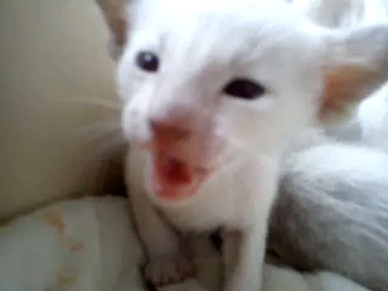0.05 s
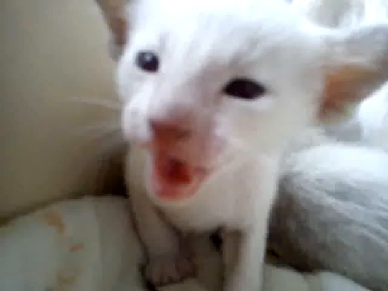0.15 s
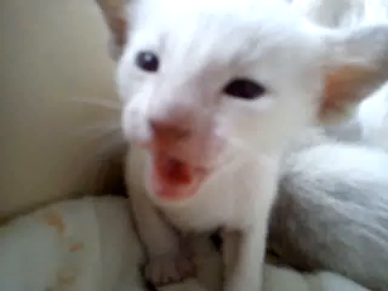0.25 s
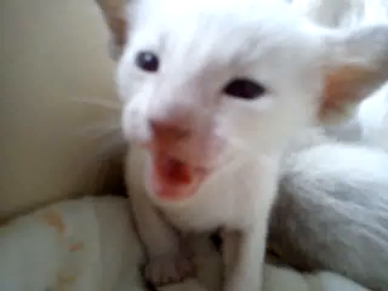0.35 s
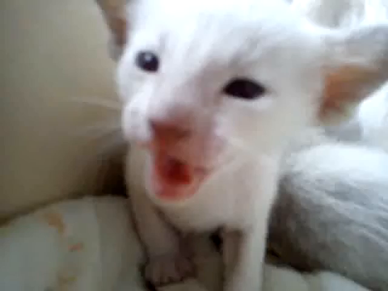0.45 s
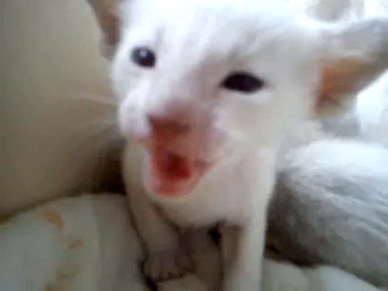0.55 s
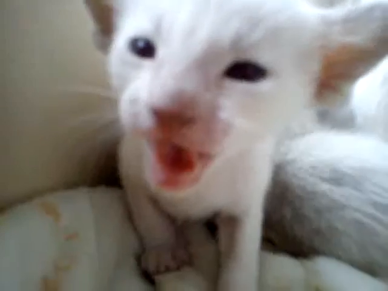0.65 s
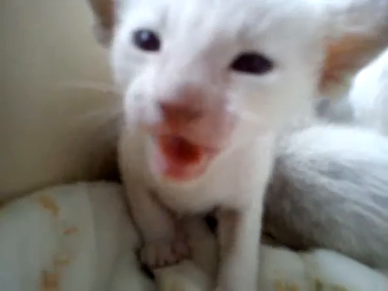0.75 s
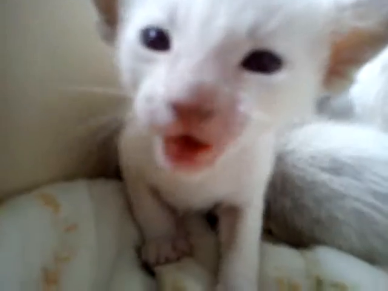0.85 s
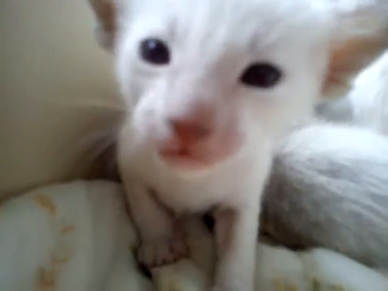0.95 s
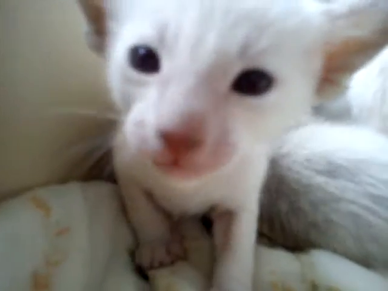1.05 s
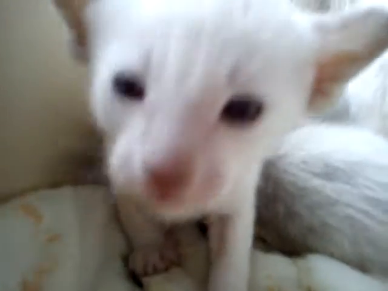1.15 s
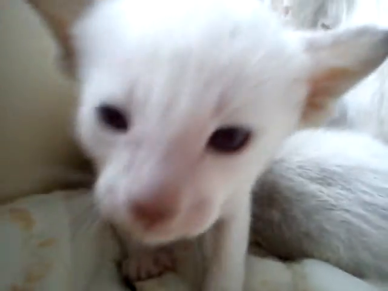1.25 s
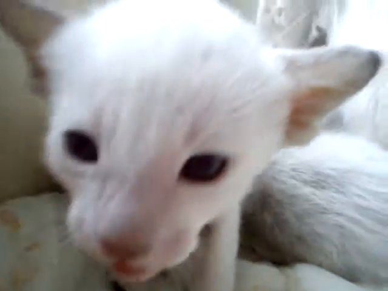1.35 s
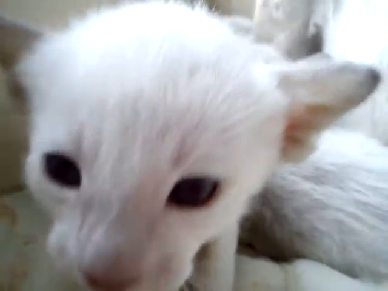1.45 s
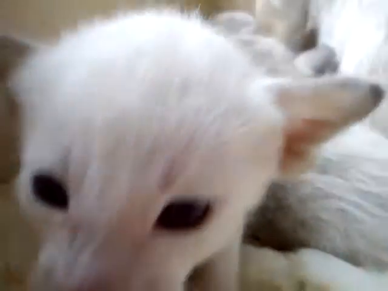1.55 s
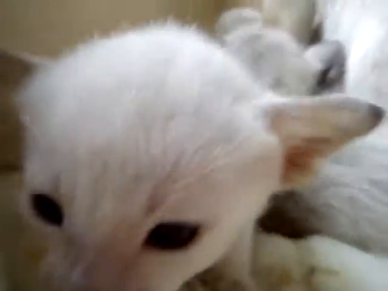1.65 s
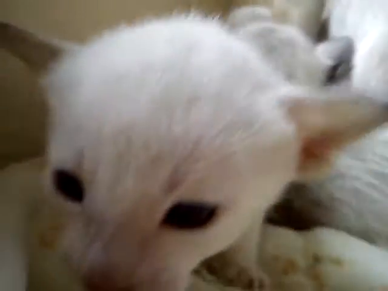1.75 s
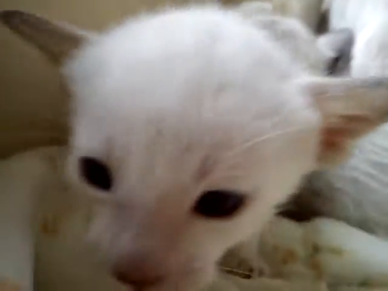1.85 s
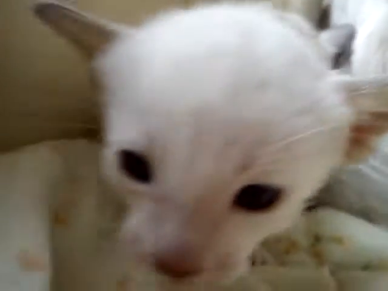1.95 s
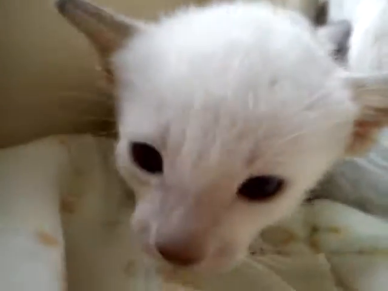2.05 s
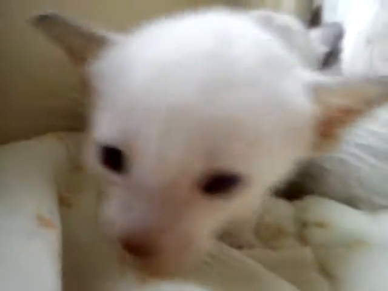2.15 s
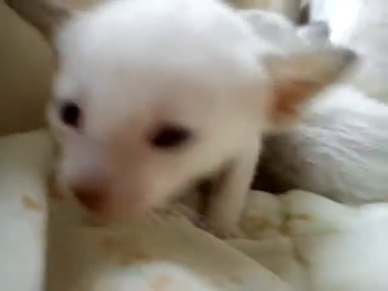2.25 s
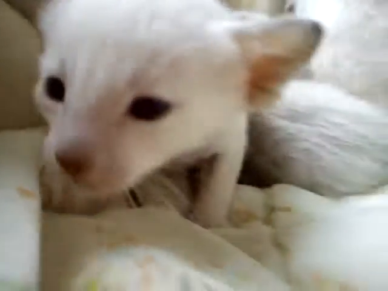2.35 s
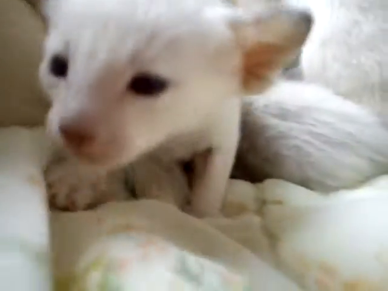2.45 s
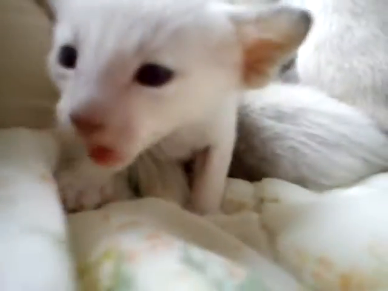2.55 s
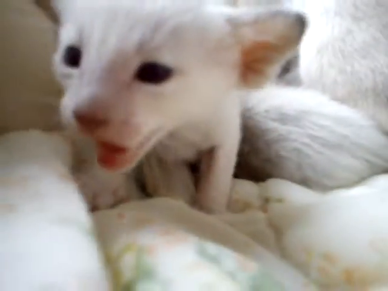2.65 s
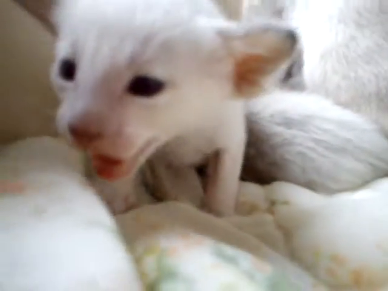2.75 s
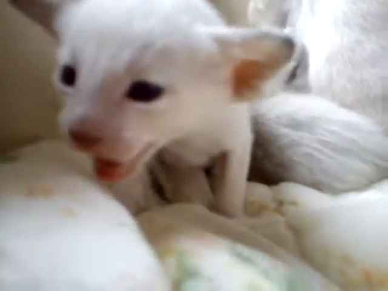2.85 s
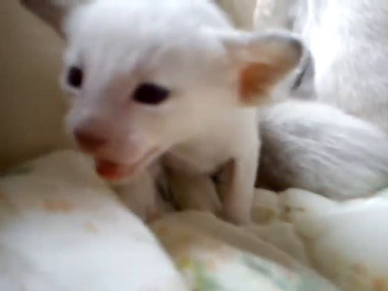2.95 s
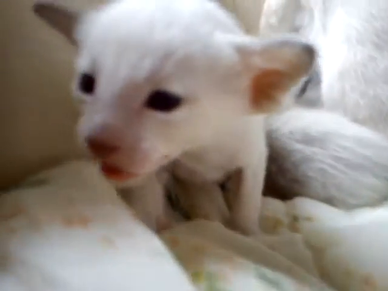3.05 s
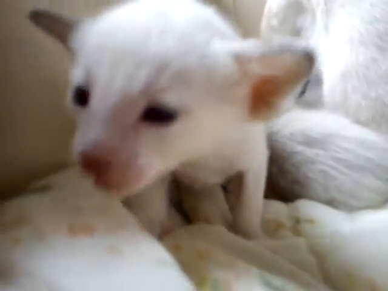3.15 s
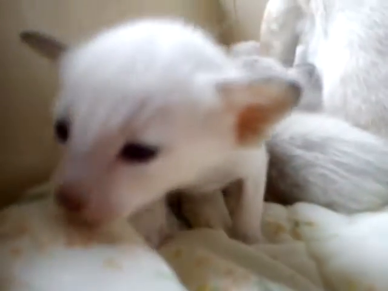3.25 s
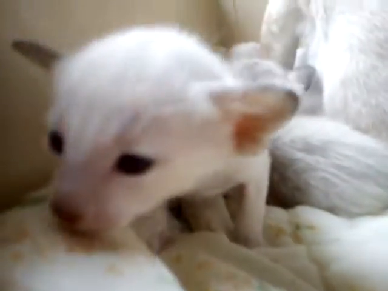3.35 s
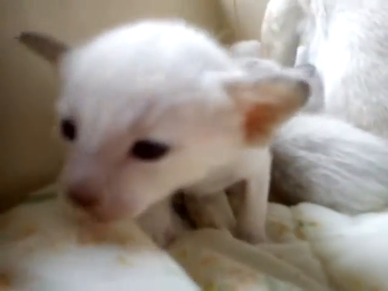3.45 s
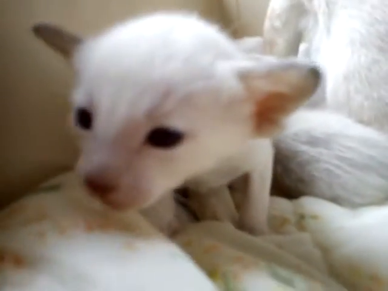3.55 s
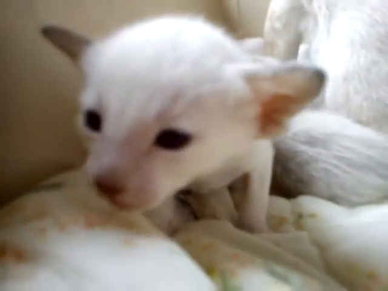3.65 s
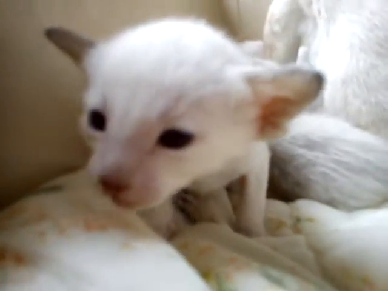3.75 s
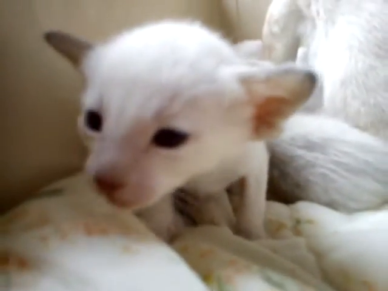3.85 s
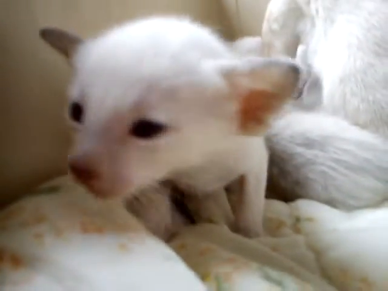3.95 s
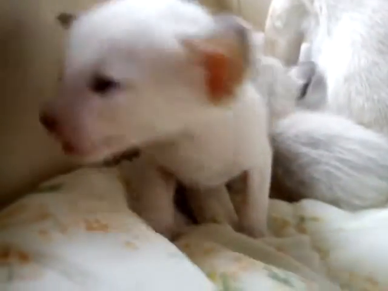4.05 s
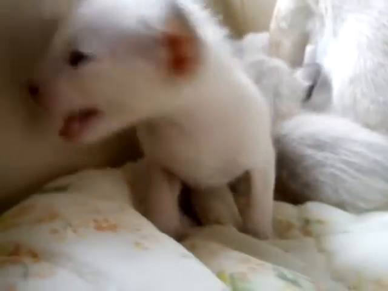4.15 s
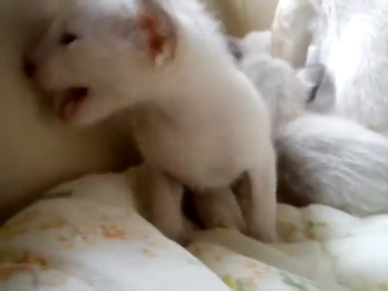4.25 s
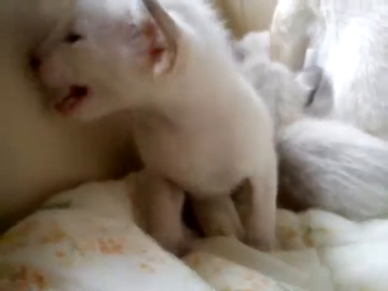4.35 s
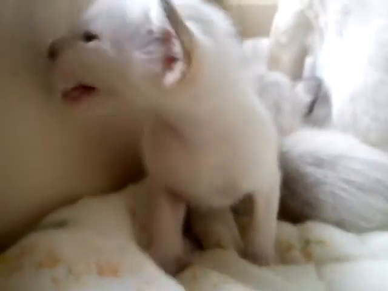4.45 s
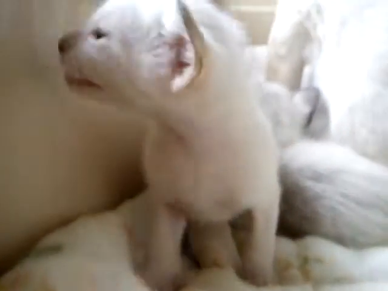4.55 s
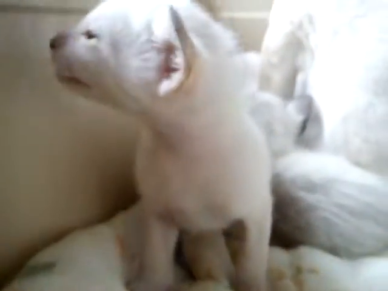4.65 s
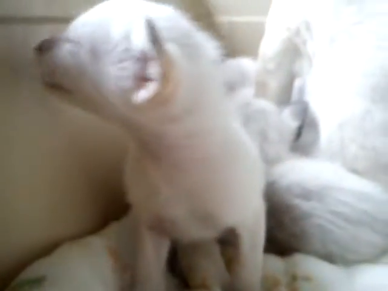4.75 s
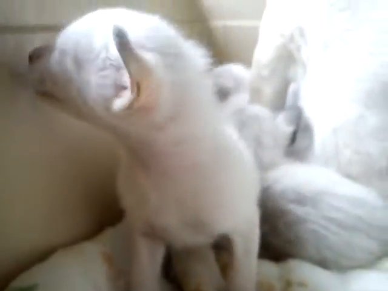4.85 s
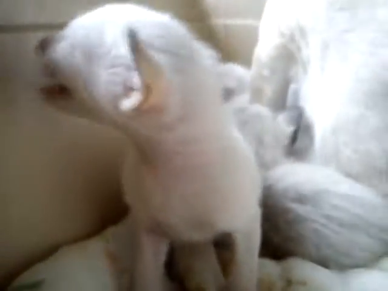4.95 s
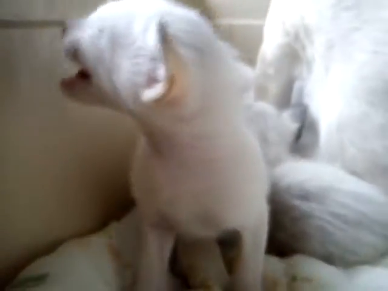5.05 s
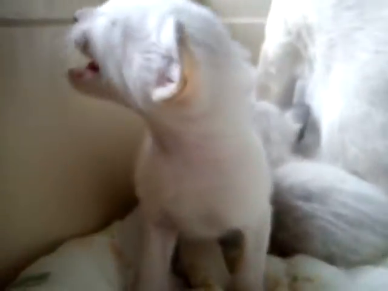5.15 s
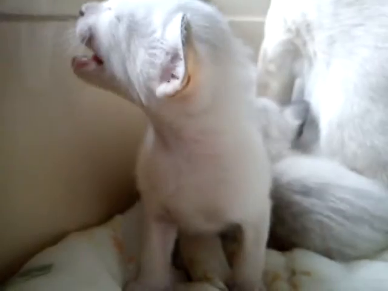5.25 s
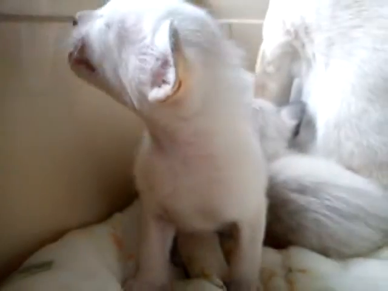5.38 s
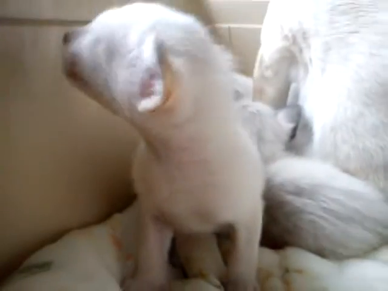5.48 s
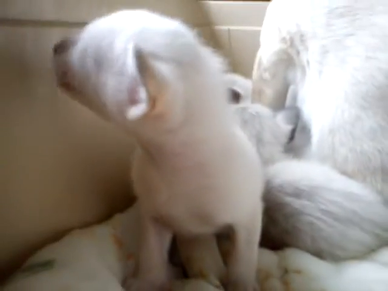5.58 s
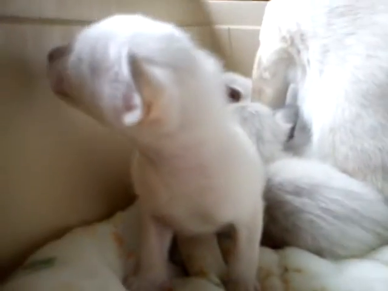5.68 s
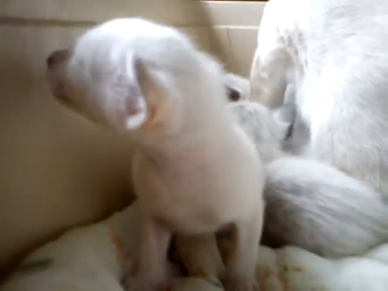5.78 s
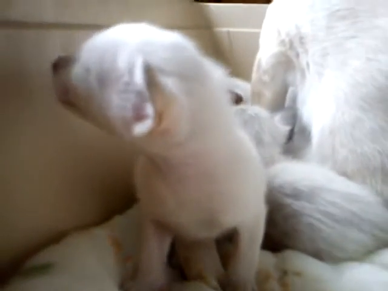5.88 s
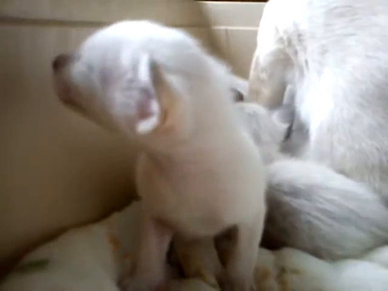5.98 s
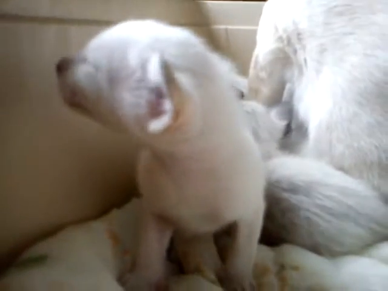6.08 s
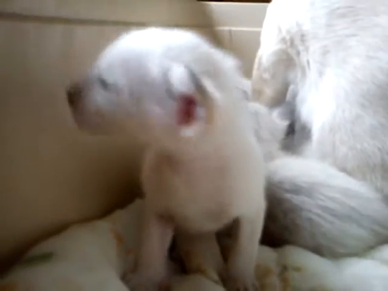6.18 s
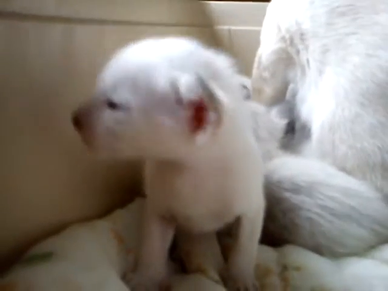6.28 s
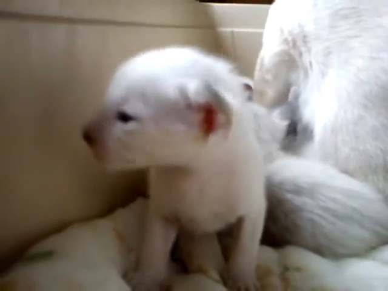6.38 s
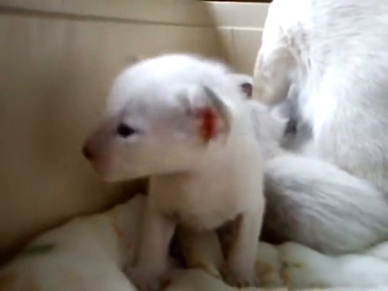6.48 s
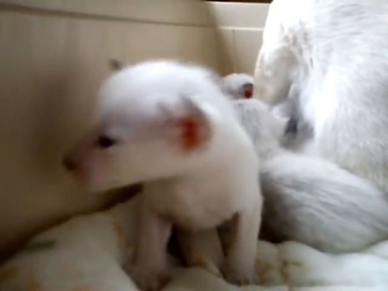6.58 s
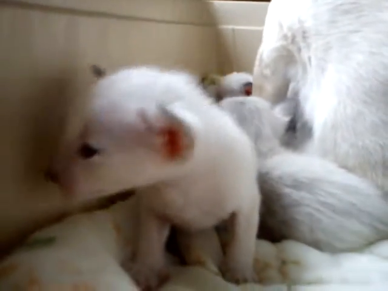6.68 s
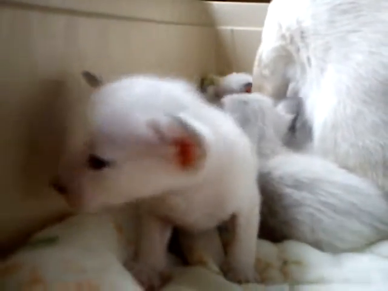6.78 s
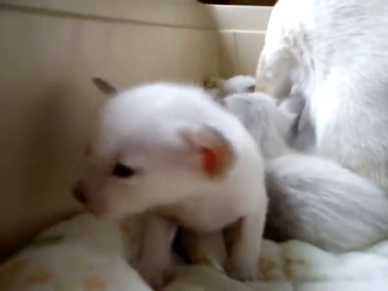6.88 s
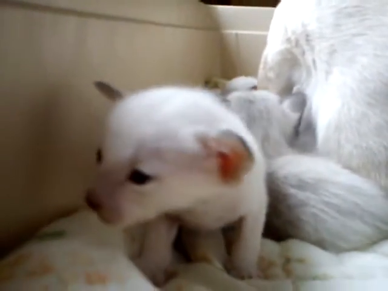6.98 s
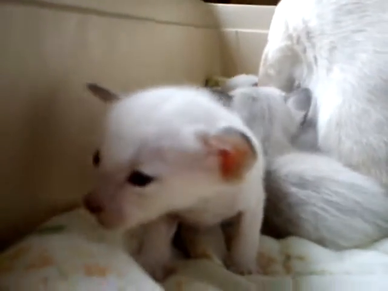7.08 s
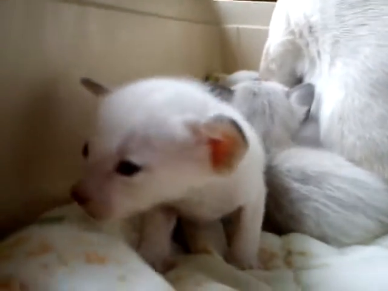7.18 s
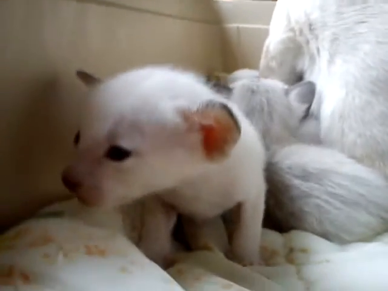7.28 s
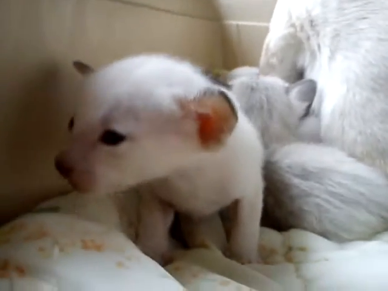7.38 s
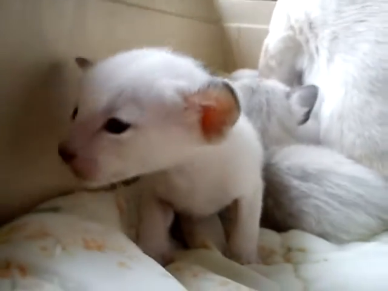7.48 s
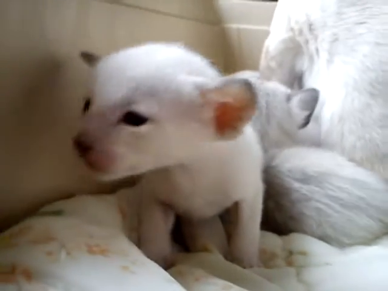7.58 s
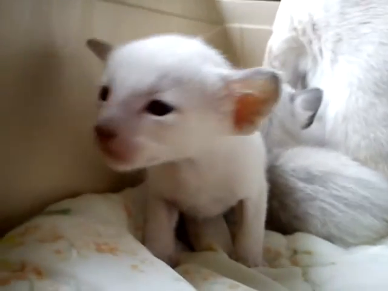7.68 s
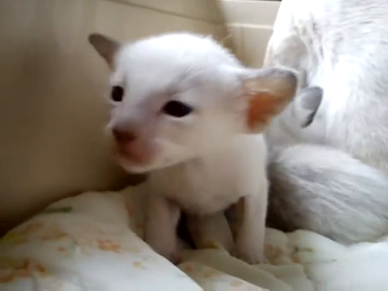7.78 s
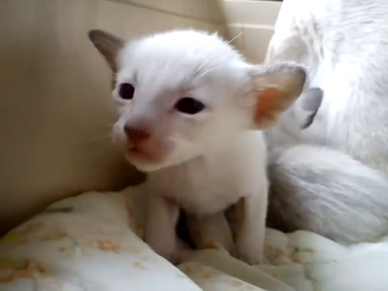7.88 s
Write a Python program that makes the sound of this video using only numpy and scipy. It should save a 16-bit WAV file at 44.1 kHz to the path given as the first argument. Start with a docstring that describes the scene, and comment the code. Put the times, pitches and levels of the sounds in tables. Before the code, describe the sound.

A tiny kitten mews in high, thin, slightly breathy cries close to a phone, with fainter littermates, squeaks, clicks and bedding rustle.

```python
"""A tiny kitten mews close to a phone in a soft-lined box: leaky vocal folds give blurred partials.
Fainter littermates answer the same way; late cries alternate strong and weak cycles. Thin squeaks
are whistles that break into hiss; ticks are bell-shaped bursts. Low room rumble and bedding rustle
are shaped noise. A narrow-band phone mirrors the top of its band and clips the loudest peaks."""
import sys
import numpy as np
from scipy import signal
from scipy.fft import rfft, irfft
from scipy.io import wavfile
from scipy.ndimage import uniform_filter1d

SR = 44100
rng = np.random.default_rng(int(sys.argv[2]) if len(sys.argv) > 2 else 0)


def bounce(signal):
    """Save signal as a 16-bit WAV file at the path given by the first command-line argument."""
    frames = np.transpose(np.atleast_2d(signal))
    limited = np.clip(frames, -1, 1)
    pcm = np.round(limited * 32767).astype(np.int16)
    wavfile.write(sys.argv[1], SR, pcm)


N = 349272
T = np.arange(N) / SR


def undb(db):
    """Amplitude of a level in dB."""
    return 10 ** (np.asarray(db) / 20)


def unit(x):
    """Scale to rms 1."""
    return x / np.sqrt(np.mean(x ** 2))


def butter(x, order, hz, kind="low"):
    """Causal Butterworth filter."""
    return signal.sosfilt(signal.butter(order, hz, kind, fs=SR, output="sos"), x)


def butter_in_phase(x, order, hz, kind):
    """Butterworth filter run both ways: no phase shift."""
    return signal.sosfiltfilt(signal.butter(order, hz, kind, fs=SR, output="sos"), x)


def steep_low(x, hz, ripple_db=.3, stop_db=80):
    """Steep elliptic low-pass."""
    return signal.sosfilt(signal.ellip(10, ripple_db, stop_db, hz, fs=SR, output="sos"), x)


def walk(rate_hz):
    """Random levels held 1 / rate_hz s and slewed twice; rms 1."""
    hold = int(SR / rate_hz)
    steps = np.repeat(rng.standard_normal(N // hold + 1), hold)
    return unit(uniform_filter1d(uniform_filter1d(steps, hold), hold)[:N])


def coloured(points):
    """Noise of rms 1 with a spectrum of (f/Hz, level/dB) points."""
    hz, db = np.transpose(points)
    f = np.arange(1, N // 2 + 2) * SR / N
    shape = undb(np.interp(np.log(f), np.log(hz), db))
    return unit(irfft(rfft(rng.standard_normal(N)) * shape, N))


def flutter(count, width_hz):
    """Complex low-passed noise of rms about 1: it spreads a tone into a band of that width."""
    z = rng.standard_normal((N // 8, 2))[:count] @ [1, 1j]
    return butter(z, 2, width_hz / 2) * np.sqrt(SR / (2.2 * width_hz))


def span(table, edge_s):
    """Sample slice of a table, its columns per sample and a gate with soft ends."""
    s, *columns = np.transpose(table)
    part = slice(int(s[0] * SR), int(s[-1] * SR))
    t = T[part]
    gate = np.clip(np.minimum(t - s[0], s[-1] - t) / edge_s, 0, 1)
    return part, [np.interp(t, s, c) for c in columns], gate


# stirring in the bedding: middle t/s, length/s, rustle lift/dB, rumble lift/dB
STIRS = [(2.303, 1, 11.5, 3.5), (3.012, 0.5, 3, 0), (5.349, 0.3, 3, -3), (5.802, .15, 1, -2.5),
         (6.799, 1, 1, -1), (7.92, 0.44, 5, 0)]


def stirs():
    """Each stir is a bell-shaped lift: (rustle dB, rumble dB) per sample."""
    return sum(np.outer(lifts_db, np.exp(-(2 * (T - s) / length_s) ** 2))
               for s, length_s, *lifts_db in STIRS)


# room rumble spectrum: f/Hz, relative level/dB per Hz
RUMBLE_SPECTRUM = [(22, -56.5), (43, -20.5), (69, -29.5), (90, -12), (136, -2.5), (328, -7), (509, -14),
                   (1150, -30.5), (1990, -32.5), (2480, -35), (4200, -63)]
RUMBLE_REST_DB = -40
DIP_MAX_DB, DIP_KNEE_DB, DIP_S = -4, -19.5, 0.097


def rumble(calls, swell_db):
    """Room rumble and hiss: shaped noise that throbs quickly and dips under loud calls."""
    power = uniform_filter1d(calls ** 2, int(DIP_S * SR))
    loud = np.sqrt(np.abs(power)) / undb(DIP_KNEE_DB)
    db = RUMBLE_REST_DB + swell_db + DIP_MAX_DB * np.tanh(loud)
    throb_db = 1.0 * walk(7.2) + 1.67 * walk(70)
    return undb(db + throb_db) * coloured(RUMBLE_SPECTRUM)


# bedding rustle spectrum: f/Hz, relative level/dB per Hz
RUSTLE_SPECTRUM = [(240, -35.5), (400, -20), (474, -3.5), (895, -6), (1120, -6.5), (1850, -10),
                   (3190, -19.5), (4300, -34)]
RUSTLE_REST_DB, PATCHY_DB = -51.5, 1.6


def rustle(stir_db):
    """Bedding scrapes in uneven grains, each octave on its own."""
    grains = undb(RUSTLE_REST_DB + stir_db + 2.0 * walk(120)) * coloured(RUSTLE_SPECTRUM)
    out = np.zeros(N)
    for hz in (350, 700, 1400, 2800):
        octave = butter_in_phase(grains, 2, (hz, 2 * hz), "band")
        out += undb(PATCHY_DB * walk(30)) * octave
    return out


BOX_T60_S, BOX_DB = 0.2, -18


def box(near):
    """Short tail of the box: the sound convolved with decaying noise of energy 1."""
    t = T[:SR // 4]
    tail = rng.standard_normal(len(t)) * undb(-60 * t / BOX_T60_S) * (t > .004)
    tail = unit(tail) / np.sqrt(len(t))
    return undb(BOX_DB) * signal.fftconvolve(near, tail)[:N]


# short ticks and smacks: t/s, level/dB, f/Hz, length/ms
TICKS = [(0.696, -13.5, 2207, 0.48), (2.04, -20.5, 514, 1.7), (3.013, -19, 1670, 0.7),
         (3.591, -33.5, 2500, 1.4), (1.011, -21, 318, 1.4), (2.398, -27, 330, 2.7), (3.476, -37, 2290, 1.6),
         (3.995, -42.5, 2390, 3.0), (5.774, -39, 1300, 1.5), (6.103, -37, 2220, 0.57),
         (4.157, -23.5, 1560, 1.9), (4.68, -23, 1760, 2.5), (5.302, -18.5, 1080, 0.6),
         (1.012, -23.5, 1610, 1.3), (5.53, -21, 570, 2.5), (6.169, -17, 1830, 1.5),
         (6.703, -29.5, 1950, 0.66), (7.347, -4.5, 1970, 0.37), (7.355, -9.5, 2100, 0.47),
         (7.377, -4.5, 2195, 0.37), (7.66, -11.5, 583, 0.57), (7.847, -18.5, 670, 2.8)]


def ticks():
    """Each tick is a bell-shaped burst of a cycle or a few, with a crumbly tail."""
    out, t = np.zeros(N), T[:800] - T[400]
    for s, db, hz, ms in TICKS:
        start = int(s * SR) - 400
        bell = np.exp(-(2 * t * 1000 / ms) ** 2 / 2)
        grain = np.tanh(flutter(len(t), width_hz=1200).real)
        crumbs = .4 * (t > .0006) * np.exp(-np.abs(t) / .003) * grain
        out[start:start + len(t)] += undb(db) * (bell + crumbs) * np.sin(2 * np.pi * hz * t)
    return out


# squeaks: roughness at loudest (0-1), more at start (0-1), curve of [t/s, level/dB after f/Hz]:
# curve columns in order: t/s, f/Hz, level/dB
SQUEAKS = [ (0.75, 0.16, [(5.22, 1816, -45.5), (5.24, 2165, -36), (5.255, 2380, -48)]),
           (0.56, 0, [(5.522, 1833, -31), (5.545, 1886, -42), (5.572, 1970, -48)]),
           (0.084, 0.44, [(6.124, 1838, -44), (6.136, 1762, -25), (6.155, 1515, -28), (6.19, 1569, -26.5),
           (6.26, 1970, -18), (6.29, 2010, -24), (6.322, 1810, -27), (6.333, 1620, -46)]),
           (0.66, 0, [(6.333, 1820, -43), (6.348, 1700, -38), (6.362, 1530, -39.5), (6.37, 1990, -43),
           (6.402, 2100, -49)]), (0.03, 0.71, [(6.59, 1760, -28.5), (6.598, 1923, -26.5),
           (6.62, 2262, -23.5), (6.643, 1940, -21.5), (6.66, 1600, -34), (6.672, 1630, -42)]),
           (0.79, 0.0081, [(6.74, 1800, -50.5), (6.79, 1900, -43.5), (6.81, 1932, -35), (6.91, 2004, -40.5),
           (6.93, 2170, -32.5), (7.0, 2052, -32.5), (7.04, 2060, -39), (7.05, 1810, -57)]),
           (0.53, 0, [(7.005, 2190, -31.5), (7.03, 2400, -33.5), (7.052, 2550, -37.5)]),
           (0.48, 0, [(7.02, 1577, -44), (7.032, 1793, -20.5), (7.044, 1720, -35)]),
           (0.088, 0.21, [(7.62, 1650, -22.5), (7.626, 1710, -19.5), (7.634, 2002, -10.5),
           (7.642, 2256, -11), (7.6455, 1900, -3.5), (7.65, 2146, -6), (7.6508, 1597, -6.5),
           (7.66, 2086, -40.5), (7.69, 1956, -38)]), (0.034, 0.23, [(7.835, 2180, -36), (7.838, 2154, -17),
           (7.8405, 1977, -10), (7.843, 1930, -7.5), (7.846, 1800, -11.5), (7.85, 1400, -25),
           (7.856, 1940, -49), (7.89, 1940, -43)]), ]
SQUEAK_WIDTH_HZ, SKIRT_DB = 295, -6
HOARSE_HZ, HOARSE_DB = 3150, -14  # mouth resonance that the hiss also fills
SQUEAK_OCTAVE_DB, OCTAVE_WIDTH_HZ = -19, 100  # octave heard only near the hoarse resonance
ROUGH_PER_DB, CLEAR_DB, ONSET_S = 0.3, 15, 0.04  # breaks up CLEAR_DB below its loudest


def squeaks():
    """Air through a tight gap: a whistle that breaks into a fluttering hiss round its pitch."""
    out = np.zeros(N)
    scratch = undb(2.4 * walk(180))  # coarse grains
    for rough, at_start, squeak in SQUEAKS:
        part, (hz, db), gate = span(squeak, edge_s=0.0019)
        count = len(hz)
        onset = np.exp(-((T[part] - T[part.start]) / ONSET_S) ** 2)
        width_hz = SQUEAK_WIDTH_HZ * (1 + rough + at_start / 2)  # the rougher, the wider
        faint_db = np.maximum(db.max() - db - CLEAR_DB, 0)
        rough = np.clip(rough + ROUGH_PER_DB * faint_db + at_start * onset, 0, 1)

        tone = np.exp(2j * np.pi * np.cumsum(hz) / SR)
        octave = undb(SQUEAK_OCTAVE_DB) * np.exp(-((2 * hz - HOARSE_HZ) / OCTAVE_WIDTH_HZ) ** 2)
        whistle = tone + octave * (1 + flutter(count, width_hz=620)) * tone ** 2

        hiss = flutter(count, width_hz) + undb(SKIRT_DB) * flutter(count, width_hz=980)
        resonance = np.exp(2j * np.pi * HOARSE_HZ * T[part])
        hoarse = undb(HOARSE_DB) * flutter(count, width_hz=700) * resonance
        broken = scratch[part] * (hiss * tone + rough * hoarse)

        sound = np.sqrt(1 - rough ** 2) * whistle + rough * broken
        out[part] += gate * np.sqrt(2) * undb(db) * sound.real
    return out


FOLDS_DB_PER_OCTAVE = -6
GLIDE_DB, SHIMMER_DB = 9, 2.2  # extra air noise in glides; flicker per partial above the first
WOBBLE_SHARE, GLIDE_JITTER_SHARE = .005, 0.008  # of the pitch: slow, and quick in glides
AIR_PER_PARTIAL = 1.25  # air grows as the partial number to this power


def voice(calls, throat, lift_shares, breathy_db, jitter_share):
    """Vocal folds give partials that the throat colours; leaking air blurs them, most in glides."""
    out, wobble, jitter = np.zeros(N), walk(30), walk(220)
    shimmer = [walk(50) for _ in range(6)]
    throat_hz, throat_db = np.transpose(throat)
    for call in calls:
        part, (hz, level_db, lift_db), gate = span(call, edge_s=0.003)
        hz = uniform_filter1d(hz, size=300, mode="nearest")  # muscles round every turn
        glide = uniform_filter1d(np.abs(np.gradient(np.log(hz))) * SR, 400)  # share per s
        strain = np.tanh(glide / 11.0)
        quick_share = jitter_share + GLIDE_JITTER_SHARE * strain  # cycles stumble in glides
        uneven = WOBBLE_SHARE * wobble[part] + quick_share * jitter[part]
        phase = 2 * np.pi * np.cumsum(hz * (1 + uneven)) / SR
        air = undb(breathy_db + GLIDE_DB * strain) * flutter(len(hz), width_hz=720)
        for k in range(1, 7):
            db = level_db + lift_shares[k - 1] * lift_db + FOLDS_DB_PER_OCTAVE * np.log2(k)
            db = db + np.interp(np.log(k * hz), np.log(throat_hz), throat_db)
            db = db + SHIMMER_DB * (k - 1) * np.tanh(shimmer[k - 1][part])
            partial = (1 + air * k ** AIR_PER_PARTIAL) * np.exp(1j * k * phase)
            out[part] += gate * np.sqrt(2) * undb(db) * partial.real
    return out


# one curve per late cry: t/s, half pitch f/Hz, level before throat/dB, odd partials lift/dB
CRIES = [
    [(6.1, 740, -43, 12), (6.128, 760, -33, 2)],
    [(6.86, 896, -42, -11), (6.898, 875, -26.5, -8), (6.915, 1093, -23.5, -11.5), (6.932, 1130, -44, 12.5),
     (6.965, 1167, -45, 7.5), (6.978, 1136, -30, -16), (7.0, 1017, -24, -24), (7.015, 970, -33, -9.5)],
    [(7.04, 829, -24.5, -14.5), (7.06, 827, -14.5, -25), (7.08, 807, -20, -22.5), (7.105, 749, -21, -32.5),
     (7.125, 735, -21.5, -34), (7.15, 707, -26.5, -17), (7.22, 712, -28, -10.5), (7.255, 654, -27, -4.5),
     (7.304, 616, -28.5, -5.5), (7.345, 567, -21.5, -10)],
    [(7.36, 899, -25.5, -4), (7.432, 847, -30.5, 3.5), (7.47, 904, -28.5, -9), (7.505, 935, -26.5, -13),
     (7.54, 1000, -18, -10.5), (7.59, 1013, -17.5, -15), (7.62, 1045, -15, -15)],
]
# cry throat: f/Hz, gain/dB
CRY_THROAT = [(600, -31.5), (900, -21), (1250, -11.5), (1650, 4.5), (2050, -0.5), (2500, 3.5), (2900, -6.5),
              (3100, -0.5), (3300, -12.5), (3600, -22.5), (4300, -80.5)]
# share of the lift per partial 1-6: odd ones only
ODD_SHARES = (1, 0, 1, 0, 1, 0)


def cries():
    """Strong and weak cycles alternate: odd partials of half the pitch."""
    return voice(CRIES, CRY_THROAT, ODD_SHARES, breathy_db=-30, jitter_share=.009)


# one curve per littermate call: t/s, pitch f/Hz, level before throat/dB, mouth lift of overtones/dB
LITTER_CALLS = [
    [(1.068, 936, -50, 1), (1.158, 940, -43.5, -2.5), (1.288, 958, -46, 1), (1.4, 876, -50, 1),
     (1.45, 830, -46, 2.5)],
    [(4.53, 515, -58, 21), (4.572, 684, -50, 16), (4.61, 928, -47, 13.5)],
    [(4.684, 899, -39, 7), (4.72, 888, -50, 2.5), (4.738, 880, -44.5, 5), (4.855, 783, -45.5, 11),
     (4.872, 1126, -36, -6.5)],
    [(4.872, 777, -48.5, 9.5), (4.898, 698, -49, 15), (4.907, 744, -52, 18), (4.92, 661, -52, 17.5),
     (4.964, 721, -48.5, 11), (4.984, 800, -49, 11), (4.99, 970, -47, 12), (5.005, 1010, -38.5, 9),
     (5.06, 1113, -37, -15), (5.1, 1094, -40, -15)],
]
# littermate throat: f/Hz, gain/dB
LITTER_THROAT = [(400, 7), (900, 2), (1500, 7), (2250, 1.5), (2500, -33), (3000, -19.5), (4300, -56.5)]
# share of the mouth lift per partial 1-6
LITTER_LIFT_SHARES = (0.065, 1, 0.83, 0.46, 0.78, 0.6)


def littermates():
    """Fainter voices with a more jittery pitch."""
    return voice(LITTER_CALLS, LITTER_THROAT, LITTER_LIFT_SHARES, breathy_db=-26.5, jitter_share=.016)


# one curve per kitten mew: t/s, pitch f/Hz, level before throat/dB, mouth lift of overtones/dB
MEWS = [
    [(.59, 1011, -45.5, 0), (.61, 990, -30, -12.5), (.688, 984, -30.5, -9.5), (.804, 961, -29.5, -3),
     (.9, 891, -30, 1.5), (.994, 799, -29.5, 0.5), (1.02, 717, -30, -3), (1.058, 561, -32, -3),
     (1.066, 538, -24.5, -3)],
    [(1.455, 606, -40, 15), (1.465, 667.5, -32, 6), (1.523, 913, -28, 2), (1.577, 1052, -32, -3),
     (1.675, 1105, -31, 9.5), (1.851, 1017, -29, -6), (1.973, 911, -26.5, 4), (2.03, 773, -28.5, 4),
     (2.037, 636, -32, 6)],
    [(2.595, 347.4, -31.5, -17), (2.629, 678, -32.5, 6.5), (2.705, 900, -29, 0), (2.739, 951, -32.5, -1.5),
     (2.863, 986, -28.5, -9), (3.053, 935, -28, -0.5), (3.1, 968, -27, -0.5), (3.233, 833.4, -28, 4),
     (3.267, 733, -31, 9), (3.279, 643, -35, 2)],
    [(4.15, 403.4, -39.5, 6.5), (4.19, 710.5, -33, 10.5), (4.288, 1003, -24, -2.5), (4.35, 1050, -23, -1),
     (4.405, 1054, -21.5, 0), (4.428, 1020, -24, -1.5), (4.455, 1066, -21.5, -1.5),
     (4.532, 991, -24.5, 0.5), (4.59, 964, -26, 5), (4.646, 795, -31, 5.5), (4.68, 687, -37.5, 11.5)],
    [(4.995, 503.6, -40, 11.5), (5.029, 742, -38.5, 15.5), (5.079, 929, -29.5, 11.5),
     (5.14, 1020, -24.5, 1), (5.219, 1071, -25, 3.5), (5.285, 1030, -27, 6), (5.383, 894, -30, 13),
     (5.457, 803, -33.5, 9), (5.527, 617, -39, 7)],
]
BREAK_DB, BREAK_S, BREAK_LEAD_S = -43, 0.018, 0.0087


def breaks():
    """Where a mew stops, the folds part and a rough puff of air dies away."""
    ends_s = np.array([call[-1][0] for call in MEWS])[:, None]
    since_s = T - ends_s + BREAK_LEAD_S
    puff = ((since_s > 0) * np.exp(-np.abs(since_s) / BREAK_S)).sum(axis=0)
    hiss = butter(rng.standard_normal(N), 2, (1100, 2600), "band")
    return undb(BREAK_DB + 4.2 * walk(200)) * puff * unit(hiss)


# kitten throat: f/Hz, gain/dB
THROAT = [(400, 4.5), (1150, -0.5), (1550, 1.5), (1850, -2), (2050, -1.5), (2350, -13.5), (2650, -22),
          (2950, -11), (3200, -5), (3550, -6.5), (3700, -11.5), (3850, -24.5), (4400, -60)]
# share of the mouth lift per partial 1-6
LIFT_SHARES = (0, 0.94, 0.27, 0.74, 0, 0.034)
RASP_DB = -34.5  # relative to the smoothed mew


def mews():
    """The near voice with a breathy haze high above it, under its level."""
    tone = voice(MEWS, THROAT, LIFT_SHARES, breathy_db=-25.5, jitter_share=0.005)
    rasp = unit(butter(rng.standard_normal(N), 2, (2920, 4400), "band"))
    return tone + undb(RASP_DB) * rasp * uniform_filter1d(np.abs(tone), size=800)


# head turning from the phone: t/s, treble gain/dB, throat hollow gain/dB
FACING = [(.6, 8, -2.5), (1.0, 4.5, 1), (1.501, 2, 3), (1.9, -9.5, -2), (2.7, 2, -12), (2.9, 4, -1.5),
          (3.199, -11.5, 7), (4.25, -5.5, 5), (4.4, -17, -13), (4.649, -5.5, 10), (5.08, 0, 9),
          (5.2, -19.5, -12), (5.4, -30, 14), (5.53, -16, 19.5)]
TREBLE_HZ, HOLLOW_HZ = 2530, (2360, 2904)


def kitten():
    """Mews through a turning head, which changes the treble and fills the hollow of the throat."""
    s, treble_db, hollow_db = np.transpose(FACING)
    out = mews()
    hollow = butter_in_phase(out, 2, HOLLOW_HZ, "band")
    out = out + (undb(np.interp(T, s, hollow_db)) - 1) * hollow
    treble = butter_in_phase(out, 3, TREBLE_HZ, "high")
    return out + (undb(np.interp(T, s, treble_db)) - 1) * treble


def scene():
    """Voices and ticks with the box tail, over rumble and rustle."""
    near = kitten() + breaks() + littermates() + cries() + squeaks() + ticks()
    stir_db, swell_db = stirs()
    background = rumble(near, swell_db) + rustle(stir_db)
    return (near + box(near) + background)[None]


START_S, FADE_S = .575, 0.013
PHONE_HZ, PHONE_EDGE_HZ, PHONE_RATE_HZ, TOP_HZ = 3530, 4560, 8000, 15757
MIRROR_DB, CLIP = -6, 0.715
SNAP_S, SNAP_DB, SNAP_DECAY_S = 5.3033, -33, 0.00032


def record(dry):
    """Late fade-in, band roll-off, top mirrored about half the phone rate, a dry snap, clipping."""
    x = dry * np.clip((T - START_S) / FADE_S, 0, 1) ** 2
    x = butter(x, 6, PHONE_HZ)
    x = steep_low(x, PHONE_RATE_HZ / 2)
    x = x * (1 + 2 * undb(MIRROR_DB) * np.cos(2 * np.pi * PHONE_RATE_HZ * T))
    x = butter(x, 24, PHONE_RATE_HZ / 2)
    x = steep_low(x, PHONE_EDGE_HZ)
    # added after the phone band, so the snap keeps its treble
    x = x + undb(SNAP_DB) * (T >= SNAP_S) * np.exp(-np.abs(T - SNAP_S) / SNAP_DECAY_S)
    return steep_low(np.clip(x, -CLIP, CLIP), TOP_HZ, ripple_db=.2, stop_db=70)


dry = scene()
out = record(dry)
bounce(out)
```